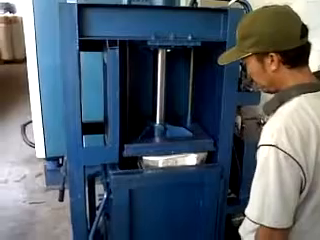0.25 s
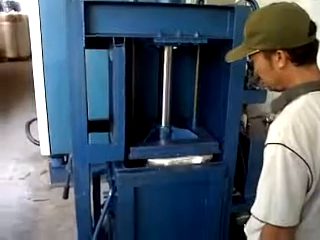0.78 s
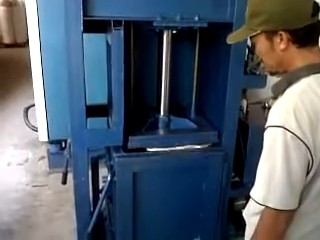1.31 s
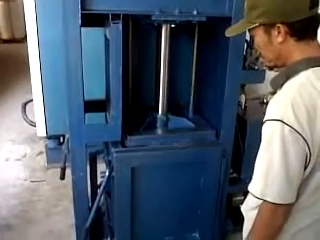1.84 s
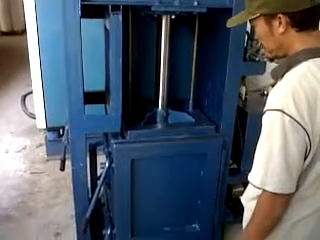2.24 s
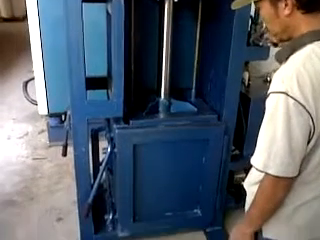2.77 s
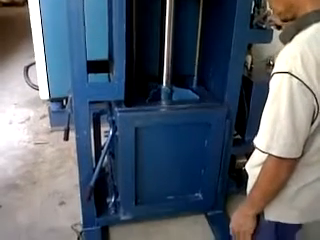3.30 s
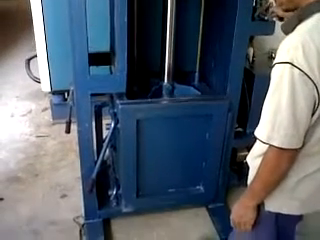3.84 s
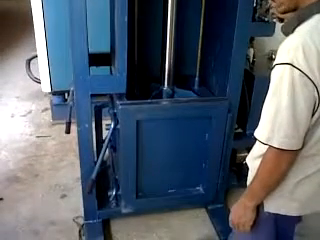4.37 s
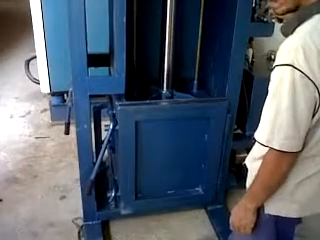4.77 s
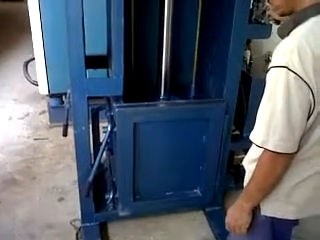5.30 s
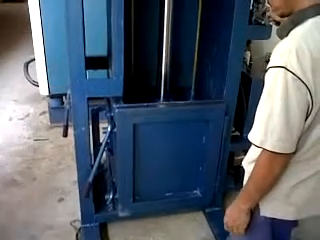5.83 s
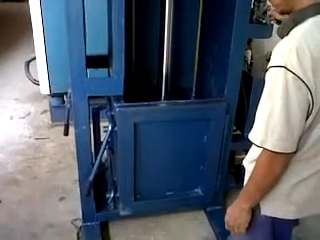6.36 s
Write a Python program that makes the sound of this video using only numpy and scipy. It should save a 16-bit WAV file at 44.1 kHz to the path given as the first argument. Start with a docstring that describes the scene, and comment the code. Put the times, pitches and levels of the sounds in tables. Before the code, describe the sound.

Metal cans crackle and buckle in a droning hydraulic press, which twice swells into a loud, rattling rush after a steel clack.

```python
"""A hydraulic baling press squeezes metal cans in a workshop, heard through a dull little microphone.
It opens loud: cans crack, steel clacks and the rush of oil rattles the frame, then the level falls back.
The pump whines and the motor hums on; the cans crackle all along and now and then buckle or thud.
Just after four seconds a second clack leads into another loud swell, the motor slowly sagging.
For the last second or so the press holds, quieter again, while a few more cans give way."""
import sys
import numpy as np
from scipy import signal
from scipy.fft import rfft, irfft, next_fast_len
from scipy.io import wavfile

SR = 44100
rng = np.random.default_rng(int(sys.argv[2]) if len(sys.argv) > 2 else 0)


def unload_audio(sound):
    """Save the sound as a 16-bit wav file, at the path given as the first command line argument."""
    columns = np.transpose(np.atleast_2d(sound))
    # keep every value between -1 and 1, then stretch to whole-number steps
    steps = np.round(np.clip(columns, -1, 1) * 32767)
    wavfile.write(sys.argv[1], SR, steps.astype(np.int16))


N = 291501
T = np.arange(N) / SR

# Resting level of the fader shared by the machine bed and the crackle: time_s, level_db
BASE_LEVEL = [(0, -35), (1.3, -35.5), (2.6, -35.5), (3.8, -37), (5.5, -37), (6.61, -37)]
# Bed and crackle swell louder and fall back: peak_s, level_db, hold_s, release_s
LEVEL_SWELLS = [(0.0, -25, 0.01, .15), (.32, -20.5, 0.033, 0.0715), (0.453, -24.5, 0.033, 0.11),
                (0.659, -28, .01, .08), (2.519, -39.5, 0.019, .08), (4.09, -36.5, 0.23, 0.11),
                (4.421, -25, 0.097, .07), (4.645, -25.5, .03, 0.24), (4.841, -29, 0.36, 0.12),
                (5.836, -38, .06, 0.034)]
# Bed and crackle briefly duck: centre_s, length_s, depth_db
LEVEL_DIPS = [(3.217, .09, -4), (3.925, 0.11, -4), (5.585, .1, -3.5), (5.754, 0.074, -6.5)]

# Tone colour of the oil rush: frequency_hz, gain_db
RUSH_EQ = [(20, -40), (50, -18), (100, -9.5), (170, -4.5), (230, -0.5), (310, 0.5), (430, -4.5),
           (1150, -3.5), (1450, -1.5), (1850, -3), (2350, 4.5), (2800, -3), (3300, -6.5), (4200, -14.5)]
# Low rumble, riding on the overall level: time_s, gain_db
RUMBLE_FADER = [(0, -11.5), (.33, -7), (1.2, -9), (2.3, -7), (3.2, -9.5), (4.1, -8.5), (4.42, -12.5),
                (4.72, -7), (5.15, -7), (6.0, -9.5), (6.61, -7.5)]

# Stages of the stroke (0 first squeeze, 1 deep squeeze, 2 full load, 3 holding): time_s, stage
STROKE_STAGES = [(2.3, 0), (2.55, 1), (4.2, 1), (4.4, 2), (5.25, 2), (5.45, 3)]
# Partials of the pump whine: multiple of shaft speed
WHINE_ORDERS = [10, 20, 22, 30, 32, 37, 40, 42, 44, 47, 48, 50, 53, 60]
# Their balance, a row each: first_squeeze_db, deep_squeeze_db, full_load_db, holding_db
WHINE_LEVELS = [(-18.5, -13, -7, -8), (-12, -11.5, -16.5, -12.5), (-22.5, -23.5, -24.5, -33),
                (-14, -15, -10.5, -17.5), (-30, -18, -31.5, -30), (-32.5, -34, -36, -18.5),
                (-6.5, -8.5, -10.5, -13.5), (-16, -24.5, -21.5, -22.5), (-22, -31, -33, -33.5),
                (-15, -22, -12.5, -12.5), (-14, -26, -35, -31), (-6.5, -2, 1, -5.5),
                (-25.5, -17, -10.5, -26), (-12, -15.5, -17, -20)]
# The electric motor slows as the pressure builds: time_s, speed_hz
MOTOR_SAG = [(0, 24.79), (1.5, 24.77), (3.3, 24.70), (4.8, 24.66), (6.6, 24.57)]
# Partials of the motor hum: multiple of shaft speed
HUM_ORDERS = [10, 12, 33, 36, 59, 62, 71, 72, 83, 91, 96]
# Their balance, a row each: first_squeeze_db, deep_squeeze_db, full_load_db, holding_db
HUM_LEVELS = [(-13.5, -16.5, -13, -15.5), (-17, -19.5, -18, -15.5), (-19, -25, -22.5, -17),
              (-18, -22, -13, -8.5), (-17.5, -15.5, -11, -13), (-37, -22, -25, -21.5),
              (-23, -12, -13.5, -12), (-20.5, -20.5, -28, -9), (-24, -37, -24, -15.5),
              (-15, -26.5, -36, -28), (-15.5, -11.5, -24, -22.5)]
# Drone of the frame, riding on the overall level: time_s, gain_db
DRONE_FADER = [(0, -9), (1.5, -13.5), (2.0, -24), (2.65, -4.5), (3.12, -15.5), (3.55, -4.5), (3.85, -1),
               (4.25, -11), (4.45, -7.5), (4.7, -5.5), (5.03, -1.5), (5.28, -6), (5.42, -12.5),
               (6.61, -14.5)]

# A steel part clacks shortly before the big swells: start_s, level_db
STEEL_CLACKS = [(.119, -15), (4.198, -15)]
# The ring of that part: pitch_hz, gain_db, width_octaves, decay_s
STEEL_MODES = [(1586, -3, 0.13, .011), (2050, -3.5, .08, 0.013), (3020, -4.5, 0.29, 0.013)]
# The bale shifts with a dull thud: start_s, level_db, pitch_hz
BALE_THUDS = [(.475, -27, 234), (0.776, -33, 283), (1.488, -34, 220), (1.829, -35, 295),
              (3.168, -30.5, 338)]
# Cans buckle: start_s, level_db, pitch_hz, width_octaves, decay_s
CAN_BUCKLES = [(.036, -11.5, 1430, 0.15, 0.015), (.039, -20.5, 700, 0.84, 0.029),
               (.309, -23.5, 2510, .99, 0.046), (.359, -24.5, 790, 0.32, 0.0109),
               (.495, -16, 1410, 0.64, 0.014), (1.097, -34, 2310, 0.42, 0.045),
               (1.65, -34.5, 1400, .5, 0.015), (1.919, -33, 906, 1, 0.017),
               (2.335, -35.5, 1870, 0.56, .015), (2.574, -34, 800, 0.21, 0.011),
               (3.046, -30, 1460, 0.51, .021), (3.305, -35.5, 1440, .17, .011),
               (3.586, -33.5, 1700, 0.28, 0.0089), (3.857, -30, 1690, 0.22, .009),
               (4.134, -35, 1460, .11, 0.017), (4.273, -28, 1970, 0.44, .012),
               (4.395, -22, 1450, .36, 0.0049), (4.524, -24.5, 614, 0.64, 0.012),
               (4.649, -24, 2050, 0.092, 0.022), (4.699, -22, 1760, .4, .018),
               (5.02, -23.5, 1170, 0.8, 0.035), (5.523, -28, 1430, 0.07, .0075),
               (5.676, -32, 2320, 0.42, .014), (5.687, -34, 696, 0.28, 0.028),
               (5.86, -31.5, 1590, .5, 0.025), (6.023, -30.5, 1870, .5, 0.03),
               (6.174, -32.5, 930, 0.58, .022), (6.175, -29, 2980, 0.079, 0.0046),
               (6.294, -29.5, 2140, 0.29, .024)]

# Dull response of the microphone: frequency_hz, gain_db
MIC_EQ = [(25, -6.5), (60, 0.5), (2700, -0.5), (3100, -5), (3500, -14.5), (4000, -18), (5000, -28),
          (5500, -49.5), (8000, -59.5)]


def amp(db):
    """Decibels to gain."""
    return 10 ** (np.asarray(db) / 20)


def unit(x):
    """Scales x to an rms of 1."""
    return x / np.sqrt(np.mean(x ** 2) + 1e-20)


def curve(rows):
    """Automation: straight lines through rows of time_s, value."""
    return np.interp(T, *np.transpose(rows))


def eq_gain(rows, f):
    """Gain at f of an EQ drawn through rows of frequency_hz, gain_db."""
    hz, db = np.transpose(rows)
    return amp(np.interp(np.log(f), np.log(hz), db))


def colour(x, gain):
    """Filters x by a gain given as a function of frequency."""
    size = next_fast_len(len(x) + 2048)
    freqs = np.fft.rfftfreq(size, 1 / SR) + 1
    return irfft(rfft(x, size) * gain(freqs), size)[:len(x)]


def wander(rate_hz):
    """A random modulator with an rms of 1."""
    knots = np.arange(0, T[-1] + 1, 1 / rate_hz)
    return unit(np.interp(T, knots, rng.standard_normal(len(knots))))


def add(mix, start_s, sound):
    """Drops a sound into the mix."""
    part = mix[max(round(start_s * SR), 0):][:len(sound)]
    part += sound[:len(part)]


def overall_level(rise_s=0.054, unrest_db=0.5):
    """The shared fader in dB: swells rise, hold and fall back to the base level; it also briefly ducks."""
    power = amp(curve(BASE_LEVEL)) ** 2
    for peak_s, level_db, hold_s, release_s in LEVEL_SWELLS:
        rise = np.exp(-(np.maximum(peak_s - T, 0) / rise_s) ** 2)
        fall = np.exp(-np.maximum(T - peak_s - hold_s, 0) / release_s)
        power += (amp(level_db) * rise * fall) ** 2
    dips_db = sum(depth_db * np.exp(-(2 * (T - centre_s) / length_s) ** 2)
                  for centre_s, length_s, depth_db in LEVEL_DIPS)
    return 10 * np.log10(power) + dips_db + unrest_db * wander(24)


def bearing_chatter(turns, partials=160):
    """Rough running surfaces repeat the same noise on every turn: an even buzz."""
    surface = irfft(np.exp(2j * np.pi * rng.random(partials)), partials * 20)
    return unit(np.interp(turns % 1, np.linspace(0, 1, len(surface)), surface))


def oil_rush(pump_turns, motor_turns, low_hz=450, high_hz=1900, flicker_db=1.95, lurch_db=1.83):
    """Oil rush and bearing chatter shake the frame in three flickering bands; the lowest lurches."""
    hiss = rng.standard_normal(N)
    drive = hiss + 0.15 * (bearing_chatter(pump_turns) + bearing_chatter(motor_turns))
    bright_db, middle_db = -4, -7
    rumble_db = curve(RUMBLE_FADER) - 2 + lurch_db * wander(15)
    lowpass = lambda f, edge_hz: 1 / (1 + (f / edge_hz) ** 10)
    bands = [(bright_db, lambda f: 1 - lowpass(f, high_hz)),
             (middle_db, lambda f: lowpass(f, high_hz) - lowpass(f, low_hz)),
             (rumble_db, lambda f: lowpass(f, low_hz))]
    out = np.zeros(N)
    for band_db, band in bands:
        noise = unit(colour(drive, lambda f: eq_gain(RUSH_EQ, f) * band(f)))
        out += noise * amp(band_db + flicker_db * wander(70))
    return out


def shaft_tone(turns, orders, levels, flutter_db, flutter_hz, jitter_rad=0.32):
    """A turning shaft sings in rough, fluttering partials whose balance follows the stroke."""
    stage, out = curve(STROKE_STAGES), np.zeros(N)
    phases = rng.random(12)  # neighbouring orders are sidebands of one tone and share its phase
    for order, stage_db in zip(orders, levels):
        level_db = np.interp(stage, range(4), stage_db) + flutter_db * wander(flutter_hz)
        angle = 2 * np.pi * (order * turns + phases[round(order / 10)])
        out += amp(level_db) * np.cos(angle + jitter_rad * wander(flutter_hz))
    return out


def frame_drone(motor_turns, order=24, waver_db=2, waver_hz=35, jitter_rad=0.42):
    """The frame drones on one wavering partial of the motor."""
    level_db = curve(DRONE_FADER) - 1 + waver_db * wander(waver_hz)
    return amp(level_db) * np.cos(2 * np.pi * order * motor_turns + jitter_rad * wander(waver_hz))


def metal_burst(pitch_hz, octaves, decay_s, rise_s=0.0025, tail_db=-20, tail_s=0.024, skirt_db=-18.5):
    """Metal gives way: a burst of pitched noise with a bright skirt, dying away in the steel chamber."""
    t = T[:8192]
    ring = lambda f: 1 / (1 + 0.5 * (np.log2(f / pitch_hz) / octaves) ** 2) ** 2
    skirt = lambda f: amp(skirt_db) * (2 * f * pitch_hz / (f ** 2 + 2 * pitch_hz ** 2)) ** 2
    noise = colour(rng.standard_normal(len(t)), lambda f: ring(f) + skirt(f))
    body = np.exp(-np.maximum(t - 2 * rise_s, 0) / decay_s)
    tail = amp(tail_db) * np.exp(-t / tail_s)
    envelope = np.minimum(t / rise_s, 1) * (body + tail)
    return unit(noise * envelope) * np.sqrt(np.mean(envelope ** 2))


def steel_clacks():
    """Each clack rings the same three resonances of steel."""
    out = np.zeros(N)
    for start_s, level_db in STEEL_CLACKS:
        for pitch_hz, gain_db, octaves, decay_s in STEEL_MODES:
            add(out, start_s, amp(level_db + gain_db) * metal_burst(pitch_hz, octaves, decay_s))
    return out


def bale_thuds(octaves=0.14, decay_s=0.014, overtone_ratio=2.03, overtone_db=-5):
    """The bale shifts in the chamber: a low note and its overtone."""
    out = np.zeros(N)
    for start_s, level_db, pitch_hz in BALE_THUDS:
        note = metal_burst(pitch_hz, octaves, decay_s)
        overtone = amp(overtone_db) * metal_burst(pitch_hz * overtone_ratio, octaves, decay_s)
        add(out, start_s, amp(level_db) * (note + overtone))
    return out


def can_crackle(gain_db=-11, snaps_per_s=260, spread_db=4, low_hz=250, high_hz=2600, patches=48):
    """Small creases snap at random, each ringing a patch of thin metal; high ones are short and sharp."""
    t, out = T[:2048], np.zeros(N)
    for pitch_hz in np.geomspace(low_hz, high_hz, patches):
        decay_s = 4 / np.sqrt(pitch_hz * 1000)
        treble_lift = (pitch_hz / 1000) ** 0.71
        ring = treble_lift * np.sin(2 * np.pi * pitch_hz * t) * np.exp(-t / decay_s)
        for when, size in rng.random((round(snaps_per_s * T[-1] / patches), 2)):
            accent_db = spread_db * min(-np.log(1 - size), 3)  # many soft snaps, a few loud
            add(out, when * T[-1], ring * amp(accent_db))
    return unit(out) * amp(gain_db)


def can_buckles():
    """Can walls fold with a crack, each at its own pitch."""
    out = np.zeros(N)
    for start_s, level_db, pitch_hz, octaves, decay_s in CAN_BUCKLES:
        add(out, start_s, amp(level_db) * metal_burst(pitch_hz, octaves, decay_s))
    return out


def scene(pump_hz=47.88):
    """Two shafts drive the machine bed; it and the crackle ride one fader, with the hits on top."""
    pump_turns = np.cumsum(pump_hz * (1 + 0.00025 * wander(8))) / SR
    motor_turns = np.cumsum(curve(MOTOR_SAG) * (1 + 0.00063 * wander(8))) / SR
    fader = amp(overall_level())
    whine = shaft_tone(pump_turns, WHINE_ORDERS, WHINE_LEVELS, flutter_db=2.5, flutter_hz=50)
    hum = shaft_tone(motor_turns, HUM_ORDERS, HUM_LEVELS, flutter_db=3, flutter_hz=20)
    bed = whine + hum + frame_drone(motor_turns) + oil_rush(pump_turns, motor_turns)
    press = fader * bed + steel_clacks()
    cans = fader * can_crackle() + can_buckles() + bale_thuds()
    return (press + cans)[None]


def record(dry, overload=1.5, tick_s=0.162, tick_db=-19, tick_decay_s=0.00015, cutoff_hz=15500):
    """A speech-band microphone that overloads softly, one thin sharp tick, then a high cut."""
    saturated = np.tanh(overload * dry[0]) / overload
    sound = colour(saturated, lambda f: eq_gain(MIC_EQ, f))
    add(sound, tick_s, amp(tick_db) * np.exp(-T / tick_decay_s))
    high_cut = signal.firwin(401, cutoff_hz, window=("kaiser", 8), fs=SR)
    return signal.oaconvolve(sound, high_cut, "same")[None]


dry = scene()
out = record(dry)
unload_audio(out)
```